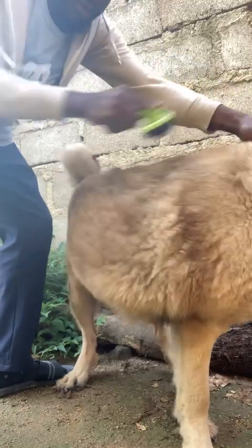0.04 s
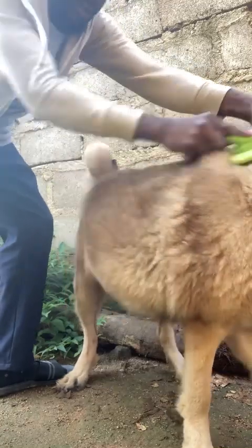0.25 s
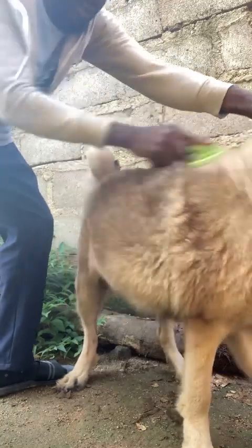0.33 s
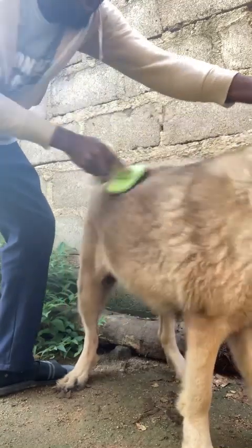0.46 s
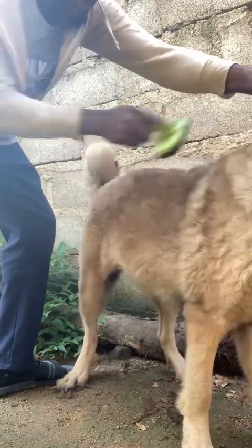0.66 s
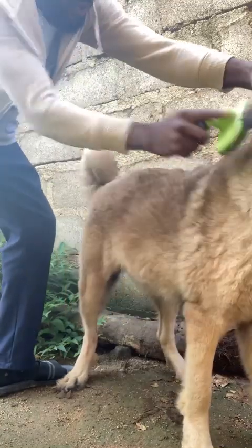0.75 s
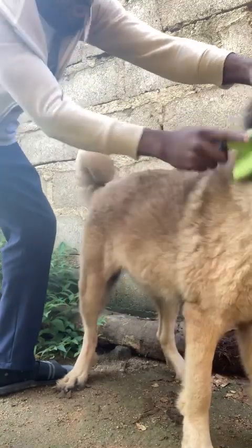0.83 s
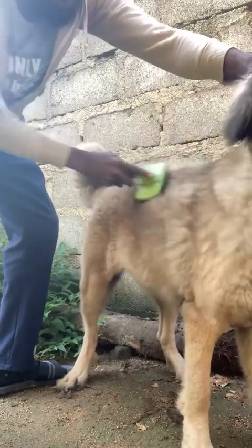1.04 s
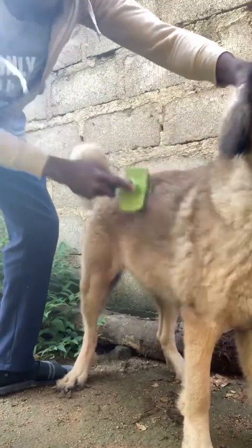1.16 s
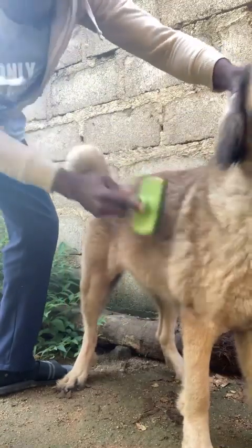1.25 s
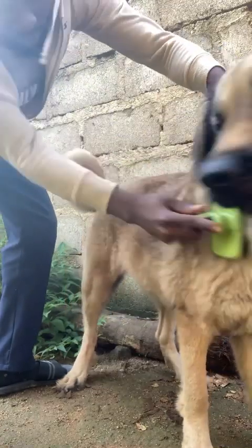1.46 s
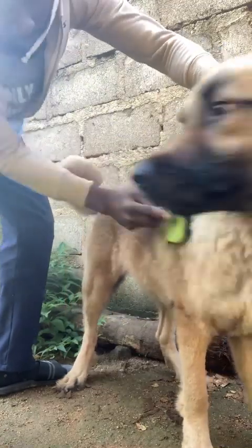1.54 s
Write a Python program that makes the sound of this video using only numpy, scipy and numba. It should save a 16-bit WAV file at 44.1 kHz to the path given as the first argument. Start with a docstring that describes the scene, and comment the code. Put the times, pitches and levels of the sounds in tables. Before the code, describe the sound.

A wire-pin brush scrapes through a dog's thick coat, dry and raspy. The first stroke swells from about 0.2 to 0.55 s, with a bright, sharp pin click at 0.22. After a near-silent gap, a second scratchy stroke runs 0.9-1.15 s with small plastic knocks, sharpest at 1.11. Tiny ticks follow from 1.3, then a softer third stroke from 1.4 to the end. Faint outdoor hush, short wall reflection.

```python
"""A wire-pin brush rakes three times through a dog's coat, a metre or two from a phone in a walled yard.
Pins slip through the hair in dense tiny plucks that ring the plastic pad, hiss in the wires and rub the coat.
Pins snap in short sprays and tick singly, the brush body knocks now and then, soft thumps come through
the dog's flank, and a near wall answers with decaying noise over a faint, slowly swelling outdoor hush."""
import sys
import numpy as np
from scipy import signal
from scipy.fft import rfft, irfft
from scipy.io import wavfile
from scipy.ndimage import uniform_filter1d
from numba import njit

SR = 44100
rng = np.random.default_rng(int(sys.argv[2]) if len(sys.argv) > 2 else 0)


def to_wav(s):
    """Save 16-bit WAV."""
    ch = np.atleast_2d(s).T  # columns
    pcm = np.round(np.clip(ch, -1, 1) * 32767)  # PCM
    wavfile.write(sys.argv[1], SR, pcm.astype(np.int16))


N = 70560
T = np.arange(N) / SR


def undb(db):
    """Decibels to amplitude."""
    return 10 ** (np.asarray(db) / 20)


def unit(x):
    """Scale to an RMS of one."""
    return x / np.sqrt(np.mean(x ** 2))


def colour(x, points):
    """Shape a spectrum by (Hz, dB) points, holding the end levels beyond them, at unit RMS."""
    p = np.array(points)
    hz = np.maximum(np.fft.rfftfreq(N, 1 / SR), 1)
    gain_db = np.interp(np.log(hz), np.log(p[:, 0]), p[:, 1])
    return unit(irfft(rfft(x) * undb(gain_db), N))


@njit
def svf(x, hz, width):
    """State-variable band-pass whose centre may move."""
    y, band, low = np.empty(len(x)), 0., 0.
    for i in range(len(x)):
        g, k = np.tan(np.pi * hz[i] / SR), width / hz[i]
        v = (band + g * (x[i] - low)) / (1 + g * (g + k))
        band, low, y[i] = 2 * v - band, low + 2 * g * v, k * v
    return y


def twice(x, hz, width):
    """Two band-passes in a row, the second twice as wide, at unit RMS."""
    hz = hz * np.ones(len(x))
    return unit(svf(svf(x, hz, 1. * width), hz, 2. * width))


def ring(x, hz, t60):
    """One decaying mode, driven by x."""
    pole = np.exp((2j * np.pi * hz - np.log(1000) / t60) / SR)
    return signal.lfilter([1], [1, -pole], x).imag


def walk(rate):
    """Random levels held 1 / rate s and slewed; unit RMS."""
    k = int(SR / rate)
    held = np.repeat(rng.standard_normal(N // k + 1), k)
    return unit(uniform_filter1d(held, k)[:N])


def tail(t60):
    """Decaying noise of unit energy."""
    h = rng.standard_normal(N // 4) * 1000. ** (-T[:N // 4] / t60)
    return h / np.sqrt(np.sum(h ** 2))


def add(out, s, x, db):
    """Mix a sound in at s seconds with its peak at db."""
    i = int(s * SR)
    out[i:i + len(x)] += (x * undb(db) / np.abs(x).max())[:N - i]


PLUCKS_PER_S, PLUCK_SPREAD_DB = 8000, 2.5


def plucks():
    """Dense slips of single pins as signed impulses, some stronger than the rest."""
    chance, sign, strength = rng.random((3, N))
    slips = chance < PLUCKS_PER_S / SR
    extra_db = PLUCK_SPREAD_DB * np.minimum(-np.log(1 - strength), 5)
    return slips * np.sign(sign - .5) * undb(extra_db)


# The brush in the coat: start_s, level_db (rub and pad), wire_hiss_db and coat_rub_db (both relative), pad_hz
STROKE_PATH = [(0, -66.5, -5, -1, 1710), (0.162, -75.5, 9.5, -24, 1800), (0.183, -53.5, 5.5, -20, 1785),
               (0.208, -58.5, -35, -7.5, 2200), (0.233, -48, 5, -5.5, 2190), (0.271, -60.5, 1, -7, 2170),
               (0.346, -54.5, -4, -6, 1990), (0.41, -46, -3.5, -12.5, 1915), (0.523, -47, -2.5, -9.5, 1736),
               (0.569, -68, -1.5, -9.5, 1678), (0.63, -85.5, 3.5, -1.5, 1880),
               (.78, -103.5, 23.5, -10.5, 2200), (0.809, -71.5, -2.5, -11, 2250),
               (0.884, -68, 5, -0.5, 1600), (0.927, -51.5, 0.5, -2, 1722), (0.992, -55, 0.5, -7, 1760),
               (1.021, -48, -4.5, -10, 1660), (1.1, -51, 1, -6.5, 1828), (1.148, -61.5, -4.5, -6.5, 2060),
               (1.238, -85.5, 6.5, 0.5, 1920), (1.39, -58, -2.5, -9.5, 2240), (1.474, -61, -4.5, -4, 1947),
               (1.511, -57.5, -1, 0.5, 2027), (1.6, -52, -0.5, -5, 1720)]
# Modes of the flexing pad: multiple of pad_hz, width_hz, level_db
PAD_MODES = [(0.472, 150.7, -19.5), (1.003, 304, -7), (1.371, 197.3, -21.5), (2.17, 349.7, -36.5)]
# Spectrum of the rub: pitch_hz, level_db (per Hz)
RUB_SPECTRUM = [(530, -49), (900, -3), (1400, 7), (4300, 2), (5700, -11.5), (8400, -51.5)]
# Spectrum of the wire hiss: pitch_hz, level_db (per Hz)
HISS_SPECTRUM = [(3240, -13.5), (5500, -14.5), (7390, -8.5), (8680, -5), (9570, -3), (12700, -4),
                 (16000, -14.5)]
COAT_HZ, COAT_WIDTH_HZ = 593.5, 406
CATCH_DB, FLICKER_DB, PAD_BREAK_DB = 1.5, 1.5, 2.5  # RMS depth of each random level
WANDER = .03  # RMS pitch drift, as a fraction


def rubbing():
    """Unevenly catching plucks ring the pad in patches and rub low in the coat; others hiss in the wires."""
    path = np.array(STROKE_PATH)
    level_db, hiss_db, coat_db, pad_hz = (np.interp(T, path[:, 0], path[:, k]) for k in (1, 2, 3, 4))
    pad_plucks = plucks() * undb(CATCH_DB * walk(180))
    wire_plucks = plucks()

    def flicker():
        return undb(FLICKER_DB * walk(39.85))

    def wander():
        return 1 + WANDER * walk(70)

    pad = np.zeros(N)
    for multiple, width_hz, db in PAD_MODES:
        patches = undb(db + PAD_BREAK_DB * walk(70))
        pad += patches * twice(pad_plucks, multiple * pad_hz * wander(), width_hz)
    mids = unit(colour(pad_plucks, RUB_SPECTRUM) * flicker() + pad)
    hiss = colour(wire_plucks, HISS_SPECTRUM) * flicker()
    coat = twice(pad_plucks, COAT_HZ * wander(), COAT_WIDTH_HZ) * flicker()
    return undb(level_db) * (mids + undb(hiss_db) * hiss + undb(coat_db) * coat)


# Spectrum of the outdoor air: pitch_hz, level_db (per Hz)
HUSH_SPECTRUM = [(40, -19), (64, -7), (96, -14), (170, -16), (442, -27), (1400, -48.5), (1980, -34),
                 (5390, -42), (14300, -59.5), (15800, -46)]
HUSH_DB, HUSH_SWELL_DB = -73.5, 1.5


def hush():
    """Faint outdoor air: shaped noise that swells slowly."""
    air = colour(rng.standard_normal(N), HUSH_SPECTRUM)
    return air * undb(HUSH_DB + HUSH_SWELL_DB * walk(5.2))


SNAP_RISE_S = .0004


def burst(length):
    """Noise that swells in quickly, holds and stops."""
    t = T[:3000]
    rise = 1 - np.exp(-(t / SNAP_RISE_S) ** 2)
    return rng.standard_normal(len(t)) * rise * np.exp(-(t / length) ** 4)


# Wire pins snapping: start_s, peak_db, burst_s, thud_db (pad) and crack_db (broad), both relative to the wires
SNAP_HITS = [(0.013, -52, 0.0017, -29.5, 22), (.1772, -34, .004, -8, 2), (.1938, -31, .0015, -22, -4),
             (.2092, -32, .0025, -14, 2), (.2163, -29, .002, -14, -2), (.219, -24, .001, -22, -10),
             (.2217, -29, .0015, -22, -10), (.2248, -8.5, .0045, -20, -19), (.2826, -34, .002, -12, -2),
             (0.9, -37, 0.014, -2, 8), (0.924, -33.5, 0.002, -8, -15)]
# Modes of the wires: pitch_hz, level_db, t60_s
WIRE_MODES = [(8800, -22, .012), (11300, -14, .005), (11900, -13, .006), (12300, 0, .011),
              (12600, -12, .008), (14800, -16, .005)]
THUD_HZ, THUD_WIDTH_HZ = 2300, 900
CRACK_HZ, CRACK_WIDTH_HZ = 12800, 6500


def snaps():
    """A short spray of released pins rings the wires, with a crack and a thud of the pad."""
    out = np.zeros(N)
    for s, peak_db, length, thud_db, crack_db in SNAP_HITS:
        spray = burst(length)
        # Dividing by sqrt(t60) offsets the energy a longer ring gathers.
        rung = sum(undb(db) * ring(spray, hz, t60) / np.sqrt(t60) for hz, db, t60 in WIRE_MODES)
        wires = twice(rung, CRACK_HZ, 2.8 * CRACK_WIDTH_HZ)
        crack = undb(crack_db) * twice(spray, CRACK_HZ, CRACK_WIDTH_HZ)
        thud = undb(thud_db) * twice(spray, THUD_HZ, THUD_WIDTH_HZ)
        add(out, s, wires + crack + thud, peak_db)
    return out


# Knocks of the brush body: start_s, peak_db, centre_hz of the modes stirred, spread_octaves
BODY_KNOCKS = [(.0221, -44.5, 3450, .22), (.138, -50, 2000, .25), (.1775, -42, 1900, .7),
               (.6724, -62, 2300, .3), (.804, -46, 2800, .35), (.9035, -39, 1600, .5),
               (.9183, -34, 1500, .6), (.9243, -33, 1200, .9), (.962, -43, 660, .25),
               (1.1071, -29.5, 2300, .6), (1.1102, -35, 3600, .6), (1.495, -47, 620, .4),
               (1.5012, -43, 2100, .3)]
# Modes of the plastic body: pitch_hz
BODY_MODES = [390, 650, 900, 1350, 1800, 2040, 2450, 2790, 2950, 3420, 3730, 4100, 4900]
BODY_T60_S, KNOCK_RISE_S, SCRAPE_DECAY_S = .022, .0008, .001


def knocks():
    """A tap and a faint scrape ring the damped plastic body, most in modes near the blow's centre."""
    out, t = np.zeros(N), T[:3000]
    for s, peak_db, centre_hz, spread in BODY_KNOCKS:
        scrape = rng.standard_normal(len(t)) * np.exp(-t / SCRAPE_DECAY_S)
        push = .5 * scrape / np.sqrt(SCRAPE_DECAY_S * SR)
        push[0] = 1  # the tap
        rung = np.zeros(len(t))
        for k, hz in enumerate(BODY_MODES):
            distance = np.log2(hz / centre_hz) / spread
            # Neighbouring modes start with opposite signs.
            rung += (-1) ** k * ring(push, hz, BODY_T60_S) / (1 + distance ** 2) ** 2
        add(out, s, rung * np.minimum(t / KNOCK_RISE_S, 1), peak_db)
    return out


# Soft thumps through the dog's flank: start_s, peak_db, pitch_hz
FLANK_THUMPS = [(0.184, -57, 104), (0.351, -56, 160), (0.807, -60, 147), (1.104, -58, 162),
                (1.531, -63.5, 53.5)]
THUMP_CYCLES = 2.5


def thumps():
    """A few cycles of a low tone under a smooth window."""
    out = np.zeros(N)
    for s, peak_db, hz in FLANK_THUMPS:
        t = T[T < THUMP_CYCLES / hz]
        window = np.sin(np.pi * t * hz / THUMP_CYCLES) ** 2
        add(out, s, np.sin(2 * np.pi * hz * t) * window, peak_db)
    return out


# Single hairs or pins letting go: start_s, peak_db, centre_hz
HAIR_TICKS = [(.8045, -52, 6500), (1.3068, -53, 10500), (1.3617, -39, 6600), (1.4178, -47, 7500),
              (1.457, -51, 10000), (1.4985, -51, 10000)]


def ticks():
    """A crackle of noise dying away over about a millisecond, in a band as wide as its centre pitch."""
    out, t = np.zeros(N), T[:400]
    for s, peak_db, hz in HAIR_TICKS:
        crackle = rng.standard_normal(len(t)) * np.exp(-t / 0.001)
        add(out, s, twice(crackle, hz, hz), peak_db)
    return out


YARD_DB, YARD_T60_S, YARD_GAP_S = -12.5, 0.046, 0.006
HIT_SIDE_DB, RUB_SIDE_DB, HUSH_SIDE_DB = -5, -4, -2.5
SCATTER_T60_S = .006
LEAN = -.2  # share of the mid in the side


def scene():
    """The two ports hear different pins and reflections, so the side is largely unrelated to the mid."""
    hits = snaps() + knocks() + ticks() + thumps()
    echo = np.r_[np.zeros(int(YARD_GAP_S * SR)), tail(YARD_T60_S)]

    def yard(x):
        """Add the near wall's answer."""
        return x + undb(YARD_DB) * signal.fftconvolve(x, echo)[:N]

    mid = yard(rubbing() + hits)
    scattered = undb(HIT_SIDE_DB) * signal.fftconvolve(hits, tail(SCATTER_T60_S))[:N]
    side = yard(scattered + undb(RUB_SIDE_DB) * rubbing())
    side = LEAN * mid + side + undb(HUSH_SIDE_DB) * hush()
    mid = mid + hush()
    return np.array([mid + side, mid - side])


SIDE_TOP_HZ, TOP_HZ = 6800, 15800


def record(dry):
    """The stereo width is kept only below about 7 kHz, and everything above 15.8 kHz is cut."""
    mid, side = (dry[0] + dry[1]) / 2, (dry[0] - dry[1]) / 2
    narrow = signal.ellip(6, .3, 45, SIDE_TOP_HZ, fs=SR, output="sos")
    side = signal.sosfiltfilt(narrow, side)
    top = signal.ellip(12, .2, 80, TOP_HZ, fs=SR, output="sos")
    return signal.sosfilt(top, np.array([mid + side, mid - side]))


dry = scene()
out = record(dry)
to_wav(out)
```